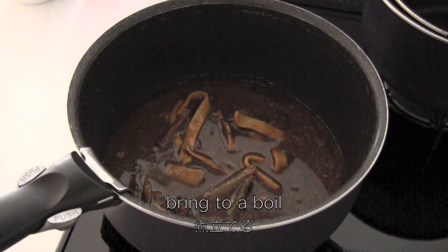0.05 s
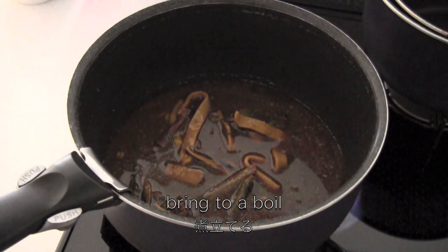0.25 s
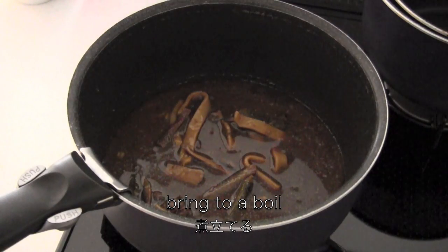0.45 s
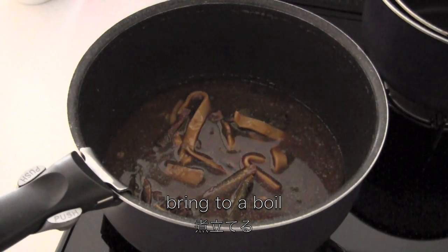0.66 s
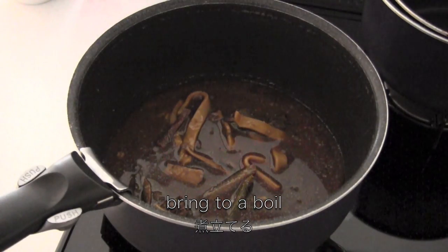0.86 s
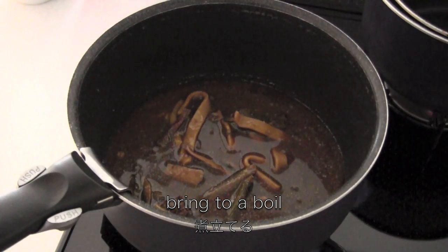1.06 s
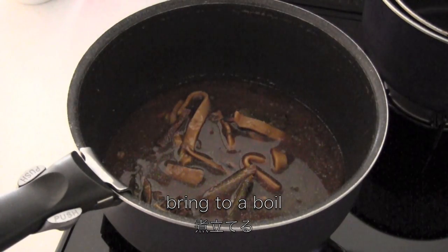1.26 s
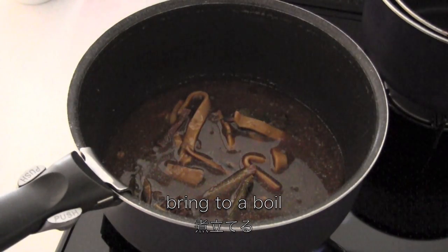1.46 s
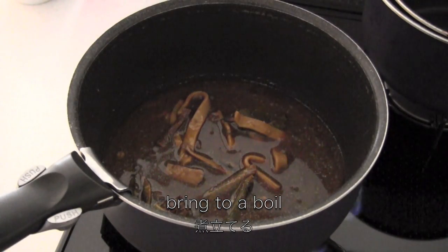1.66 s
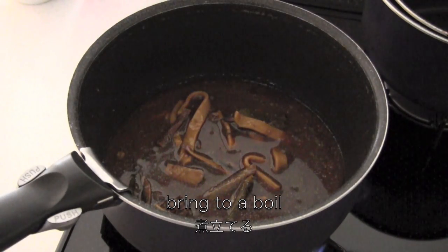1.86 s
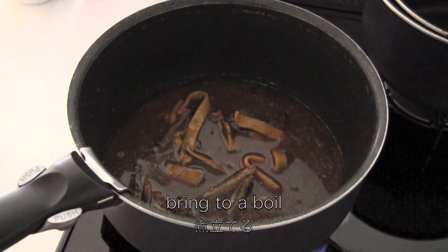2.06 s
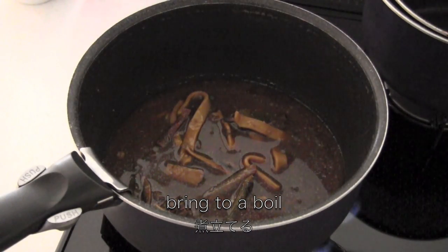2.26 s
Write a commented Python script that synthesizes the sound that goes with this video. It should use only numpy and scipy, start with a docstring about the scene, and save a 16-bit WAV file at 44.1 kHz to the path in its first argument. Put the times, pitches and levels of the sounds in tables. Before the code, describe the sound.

Sharp electric gas-burner clicks, five per second, with a brief low whoof as the gas lights

```python
"""A gas hob and a saucepan in a small kitchen, heard by two close microphones over steady hiss and hum.
The unlit jet whistles faintly; the igniter then sparks about five times a second, each spark a short
noise burst with echoes, rattle, metal ring and room tail. After the first one the gas catches in pops,
fluttering noise, a low thud and random crackles; a softer puff follows and the whistles have sunk.
Later the knob ticks once, a duller blow with a short ring, while the sparks go on."""
import sys
import numpy as np
from scipy import signal
from scipy.fft import rfft, irfft
from scipy.io import wavfile

SR = 44100
rng = np.random.default_rng(int(sys.argv[2]) if len(sys.argv) > 2 else 0)


def store_pcm(level_fs):
    """Save levels as 16-bit WAV."""
    pcm = np.round(np.clip(level_fs, -1, 1) * 32767).astype(np.int16)
    wavfile.write(sys.argv[1], SR, np.atleast_2d(pcm).T)


N = 101429
TAPS = 16384  # length of every short sound [samples]

# flutter of the catching flame, which the sputter follows: (time [s], level [dB])
FLUTTER = [(.235, -62), (.265, -50), (.315, -46.5), (.345, -46.5), (.38, -48.5), (.41, -53.5), (.45, -62),
           (.52, -66), (.7, -67.5)]


def igniter():
    """Every spark takes nearly the same paths under the pan; the arc wanders a little."""
    # sparks: (time [s], relative level [dB], extra level of the treble [dB])
    sparks = [(0.2303, -1, 2.5), (0.4222, -0.46, .5), (0.6145, -0.4, 2), (0.8101, -1.5, 1),
              (1.0031, -0.8, 0.5), (1.2, -1.25, .5), (1.3960, -0.64, 0.5), (1.592, -0.1, 0),
              (1.7852, -0.1, 0.5), (1.9776, 0.36, -0.5)]
    # colour of a spark: (frequency [Hz], relative level [dB])
    spark_colour = [(100, -35), (400, -22.5), (640, -9), (760, -21), (880, -13.5), (1160, -17.5),
                    (1290, -8), (1800, -7), (2200, -12.5), (2600, -7.5), (3200, -8.5), (3800, -5),
                    (4700, -1.5), (5700, .5), (8000, 1), (11000, -1), (13300, -2), (14500, -9), (15500, -7),
                    (17000, -32)]
    # resonances of the burner and the gap under the pan: (frequency [Hz], relative level [dB])
    burner = [(4432, -0.5), (4882, -4.5), (5490, 0.5), (5683, -10), (6486, -3.5), (7045, -10.5), (7927, -5),
              (8414, -2.5), (9583, 2.5), (10480, 0.5), (10971, 3), (12307, -6)]
    burner_db, burner_t60_s = -7.5, 0.045
    room_db = -8.5
    wander = 0.25  # share of each arc's energy that is new
    bright_hz = (6000, 11000)  # the extra treble level grows from the first to the second

    out = np.zeros((2, N))
    usual = arc()
    metal = amp(burner_db) * ring([(hz, level, burner_t60_s) for hz, level in burner])
    for s, db, bright_db in sparks:
        snap = np.sqrt(1 - wander) * usual + np.sqrt(wander) * arc()
        spark = coloured(snap + amp(room_db) * room(), spark_colour) + metal
        shelf = amp(np.interp(np.fft.rfftfreq(TAPS, 1 / SR), bright_hz, [0, bright_db]))
        add(out, s, amp(db) * irfft(rfft(spark) * shelf))
    return out


def arc():
    """One arc: its crack, then the rattle of dense reflections between hob and pan."""
    crack_db, rattle_db = -4, -5
    return amp(crack_db) * crack() + amp(rattle_db) * rattle(t60=0.056, rise_s=0.00099)


def crack():
    """A snap: a nearly flat-spectrum burst about a millisecond long, and its nearest echoes."""
    # echoes off hob and pan: (delay [s], level [dB])
    echoes = [(.00125, -5.5), (.0023, -10), (.0037, -6.5)]
    # difference between the microphones: (frequency [Hz], side-to-mid level [dB])
    crack_side = [(500, -16), (5000, -14), (8000, -12), (12000, -3.5), (16000, -8)]
    length_s = 0.000702

    gate = np.exp(-(np.arange(TAPS) / SR / length_s) ** 4)
    burst = rng.standard_normal((2, TAPS))
    # flatten the spectrum and shorten the burst in turn
    for _ in range(4):
        phase = np.angle(rfft(gate * burst))
        burst = irfft(np.exp(1j * phase))
    mid, side = rfft(gate * burst)
    burst = unit(gate * spread(mid, side, crack_side))
    out = burst.copy()
    for delay, db in echoes:
        add(out, delay, amp(db) * burst)
    return out


def ignition():
    """The gas catches: soft pressure pops over flutter and a low thud, then a second puff."""
    # pops as the flame runs round the burner: (time [s], level [dB], lowpass edge [Hz])
    pops = [(.2632, -21, 1800), (0.2713, -15, 1890), (0.2824, -16.5, 710), (0.2889, -19, 1890),
            (.3068, -18.5, 1390), (0.3092, -18.5, 1520), (.3145, -16, 453), (.3183, -22, 1300),
            (.3515, -24, 600), (0.4058, -19, 600)]
    # low thud of the swelling flame: (time [s], level [dB])
    thud = [(.24, -80), (.28, -56), (.31, -49), (.36, -64), (.395, -48.5), (.44, -57), (.52, -67)]
    # second, softer puff: (time [s], level [dB])
    puff = [(.48, -73), (.536, -53), (.56, -58), (.598, -53), (.64, -72), (.75, -75)]
    # colours of pops, flutter, thud and puff: (frequency [Hz], relative level [dB])
    pop_colour = [(25, -21), (70, -9), (110, -2.5), (180, -6), (270, -0.5), (450, -1.5), (800, -3),
                  (1050, -7), (1300, 0), (4000, -7.5), (16000, -5)]
    flutter_colour = [(25, -10), (70, -7), (110, -3), (180, -19), (260, 4), (380, -3), (520, -4.5),
                      (780, -0.5), (1000, -12), (1300, -7.5), (2200, -13), (5000, -19.5), (16000, -38)]
    thud_colour = [(20, -22), (70, -17.5), (105, 9), (135, -7), (200, -25), (600, -52)]
    puff_colour = [(30, -16), (105, -2), (180, -8), (260, 1), (400, -8.5), (620, -0.5), (780, -2.5),
                   (1000, -9), (1400, -13), (2500, -14), (16000, -46)]
    rattle_db = -2.5

    out = np.zeros((2, N))
    for s, db, edge_hz in pops:
        push = signal.unit_impulse(TAPS) + amp(rattle_db) * rattle(t60=0.062, rise_s=0.001)
        b, a = signal.butter(2, edge_hz, fs=SR)
        pop = signal.lfilter(b, a, coloured(push, pop_colour))
        add(out, s, amp(db) * unit(pop))
    for curve, colour in (FLUTTER, flutter_colour), (thud, thud_colour), (puff, puff_colour):
        out += amp(level_over_time(curve)) * wash(lambda hz: amp(read(colour, hz)))
    return out


def sputter():
    """Small flamelets snap at random, as loud as the flutter allows, while the gas catches."""
    # colour of a snap: (frequency [Hz], relative level [dB])
    snap_colour = [(100, -20), (500, -6), (1300, 2), (2100, -5), (3200, -12), (8000, -22), (16000, -40)]
    snaps_per_s = 220
    below_flutter_db = -8.5

    chance, size = rng.random(N), rng.standard_normal(N)
    snaps = size * (chance < snaps_per_s / SR)
    grain = coloured(signal.unit_impulse(TAPS)[None], snap_colour)
    crackle = signal.fftconvolve(snaps[None], grain, axes=1)[:, :N]
    crackle = np.sqrt(N) * unit(crackle)  # rms 1
    return crackle * amp(below_flutter_db + level_over_time(FLUTTER))


def under_pan(x, db=-1.5):
    """Adds the hollow resonances of the gap between burner and pan."""
    # resonances that colour the flame: (frequency [Hz], width [Hz], boost over the direct sound [dB])
    pan_gap = [(261, 27, 4), (505, 25, 4), (624, 29, 7), (796, 33, 6.5), (1253, 78, 6.5), (1890, 79, 4)]
    hollow = np.zeros_like(x)
    for hz, width, boost in pan_gap:
        b, a = signal.iirpeak(hz, hz / width, SR)
        hollow += (amp(boost) - 1) * signal.lfilter(b, a, x)
    return amp(db) * (x + hollow)


def knob():
    """One duller mechanical tick: snap, rattle and room tail, with a short modal ring."""
    # colour of the tick: (frequency [Hz], relative level [dB])
    knob_colour = [(200, -34), (1000, -20), (1500, -6), (2000, -8.5), (2600, -1.5), (3350, 3.5),
                   (4100, -12), (5500, -4.5), (6500, -11), (7300, -3), (8300, -11), (10900, 2),
                   (12800, -12), (13800, -4), (16000, -23)]
    # modes of the knob: (frequency [Hz], relative level [dB], time to fall 60 dB [s])
    knob_modes = [(1690, -2, 0.15), (2840, -11, .2), (3340, 2, 0.089), (10870, -3, .07)]
    tick_s = 1.2744
    tick_db, ring_db = -6.5, -17.5
    snap_db, room_db = -8.5, -9.5  # against the rattle

    out = np.zeros((2, N))
    blow = amp(snap_db) * crack() + rattle(t60=0.071, rise_s=0.0003) + amp(room_db) * room()
    tick = amp(tick_db) * coloured(blow, knob_colour)
    add(out, tick_s, tick + amp(ring_db) * ring(knob_modes))
    return out


def gas():
    """Steady noise hiss and narrow-band hum, with faint whistles that sink when the gas is lit."""
    # gas hiss and kitchen rumble: (frequency [Hz], relative level per Hz [dB])
    hiss_colour = [(20, -4), (50, -0.5), (80, 6), (105, 14.5), (135, 13), (175, 16), (215, 7), (265, 8.5),
                   (350, 3.5), (800, 1.5), (1300, 4), (1550, -3.5), (2600, -0.5), (3700, -6), (7000, -7),
                   (12000, -9.5), (15400, -17), (16200, -45)]
    # kitchen hum and faint steady tones: (frequency [Hz], width [Hz], level [dB])
    tones = [(107, 8.9, -67), (896, 8.3, -81), (1772, 79, -72), (2790, 46, -80.5)]
    # whistles of the unlit jet: (frequency [Hz], width [Hz], level before they sink [dB])
    whistles = [(5710, 200, -74.5), (7350, 180, -80), (8560, 120, -75.5)]
    hiss_db, lit_whistle_db = -58.5, -6.5
    lit_s = (0.33, 0.5)  # the whistles sink from the first time to the second

    def band(centre, width, db):
        return amp(db) * wash(lambda hz: 1 / (1 + ((hz - centre) / width * 2) ** 2))

    hiss = amp(hiss_db) * wash(lambda hz: amp(read(hiss_colour, hz)))
    hum = sum(band(*row) for row in tones)
    whistle = sum(band(*row) for row in whistles)
    sink = amp(np.interp(np.arange(N) / SR, lit_s, [0, lit_whistle_db]))
    return hiss + hum + sink * whistle


def room(build_s=0.0052):
    """The kitchen's tail: noise that builds up briefly, each band dying at its own speed."""
    # decay of the kitchen: (frequency [Hz], time to fall 60 dB [s])
    room_t60 = [(200, 1.08), (1500, 0.22), (3000, 0.26), (6000, 0.3064), (10000, 0.2376), (15000, 0.1847)]
    # colour that the kitchen gives back: (frequency [Hz], relative level [dB])
    room_colour = [(200, -5.5), (1500, 1), (3000, 3.5), (5500, 1), (8000, -2), (12000, 2), (15500, -0.5),
                   (16500, -29)]
    hz, t, z = signal.stft(noise(TAPS), SR, nperseg=256)
    decay = np.exp(-np.log(1000) * t / read(room_t60, hz)[:, None])
    z = z * amp(read(room_colour, hz))[:, None] * decay
    tail = signal.istft(z, SR)[1][:, :TAPS]
    return unit(tail * np.minimum(np.arange(TAPS) / SR / build_s, 1))


def rattle(t60, rise_s):
    """Dense reflections: noise that rises at once and dies quickly."""
    t = np.arange(TAPS) / SR
    decay = np.exp(-np.log(1000) * t / t60)
    return unit(noise(TAPS) * np.minimum(t / rise_s, 1) * decay)


def ring(modes):
    """Struck modes: decaying sines of random phase, rows of (frequency [Hz], level [dB], t60 [s])."""
    t = np.arange(TAPS) / SR
    out = np.zeros(TAPS)
    for hz, db, t60 in modes:
        decay = np.exp(-np.log(1000) * t / t60)
        out += amp(db) * decay * np.sin(2 * np.pi * (hz * t + rng.random()))
    return unit(out)


def noise(size):
    """White noise as two close microphones hear it."""
    # difference between the microphones: (frequency [Hz], side-to-mid level [dB])
    noise_side = [(30, -21), (100, -25), (300, -14), (1000, -13.5), (2500, -18.5), (5000, -13),
                  (8000, -9.5), (12000, -11), (15000, -25)]
    mid, side = rfft(rng.standard_normal((2, size + size % 2)))
    return spread(mid, side, noise_side)[:, :size]


def spread(mid, side, side_db):
    """Left and right from two spectra; the second carries the difference between the microphones."""
    width = amp(read(side_db, np.linspace(0, SR / 2, len(mid))))
    return irfft((mid + np.outer([1, -1], side * width)) / np.sqrt(1 + width ** 2))


def wash(gain):
    """Steady noise of rms 1 with the spectrum gain(Hz)."""
    shaped = irfft(rfft(noise(N)) * gain(np.fft.rfftfreq(N, 1 / SR)), N)
    return np.sqrt(N) * unit(shaped)


def coloured(x, points):
    """Passes a short sound through a causal minimum-phase filter of energy 1."""
    log_gain = np.log(amp(read(points, abs(np.fft.fftfreq(TAPS, 1 / SR)))))
    # the Hilbert transform of the log gain gives the phase
    spectrum = np.exp(signal.hilbert(log_gain).conj())
    kernel = np.fft.ifft(spectrum).real[:TAPS // 4]
    return signal.fftconvolve(x, unit(kernel)[None], axes=1)[:, :TAPS]


def level_over_time(points):
    """A level curve in dB over the whole scene, silent outside its points."""
    s, db = np.transpose(points)
    return np.interp(np.arange(N) / SR, s, db, left=-np.inf, right=-np.inf)


def read(points, hz):
    """Reads a table of points on a log-frequency axis."""
    f, value = np.transpose(points)
    return np.interp(np.log(hz + 1), np.log(f + 1), value)


def amp(db):
    """Decibels to gain."""
    return 10 ** (np.asarray(db) / 20)


def unit(x):
    """Scales a sound to energy 1 per channel, averaged over the channels."""
    return x / np.sqrt(np.mean(np.sum(x ** 2, -1)) + 1e-20)


def add(mix, s, sound):
    """Lays a sound into the mix at s seconds, cut off at the end of the mix."""
    part = mix[:, round(s * SR):][:, :sound.shape[-1]]
    part += sound[..., :part.shape[1]]


def scene():
    """All sources, leaning slightly to the right, but to the left in the highest treble."""
    # balance of the two microphones: (frequency [Hz], left level minus right level [dB])
    balance = [(100, -0.65), (400, -.8), (700, -2.8), (1400, -0.88), (3300, -1.1), (6000, -0.82),
               (9000, -1.2), (11500, -1), (13000, 1), (16000, .5)]
    flame = under_pan(ignition() + sputter())
    mix = igniter() + flame + knob() + gas()
    lean_db = read(balance, np.fft.rfftfreq(N, 1 / SR))
    return irfft(rfft(mix) * amp(np.outer([.5, -.5], lean_db)), N)


def record(dry, ceiling=0.43):
    """The microphone rounds the sharpest peaks; then a lowpass limits the band."""
    edge_hz = 16700
    rounded = ceiling * np.tanh(dry / ceiling)
    lowpass = signal.firwin(255, edge_hz, window=("kaiser", 9), fs=SR)
    return signal.oaconvolve(rounded, lowpass[None], "same", axes=1)


dry = scene()
out = record(dry)
store_pcm(out)
```